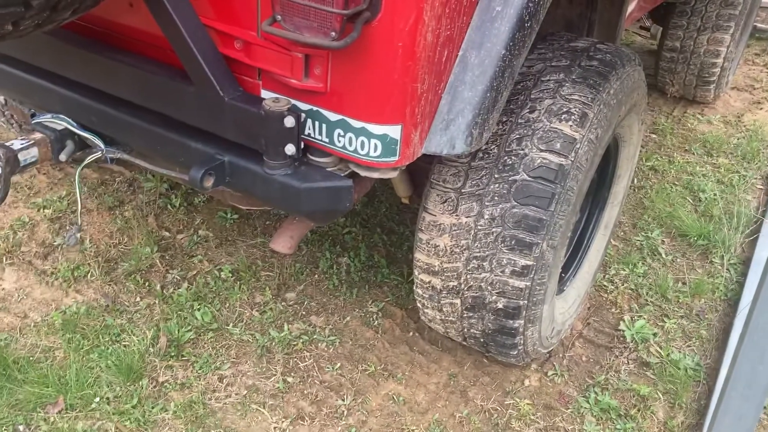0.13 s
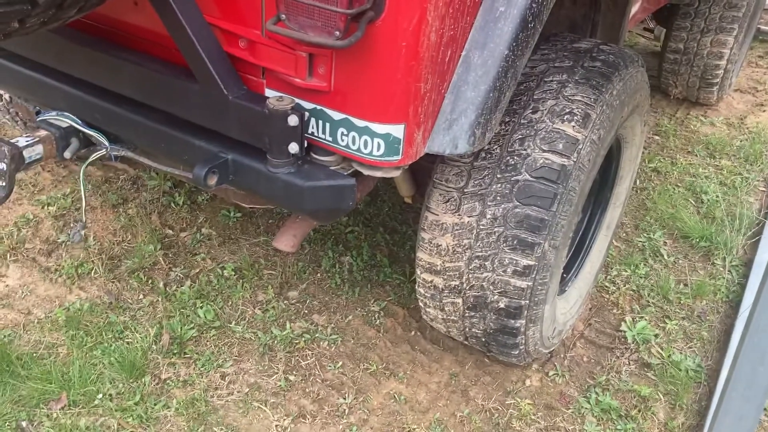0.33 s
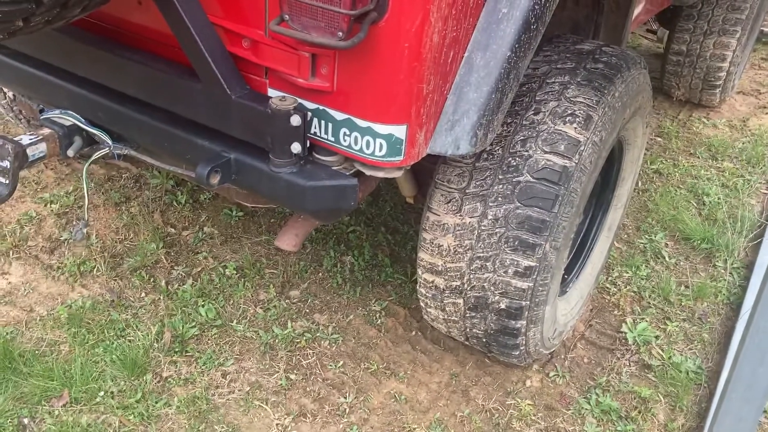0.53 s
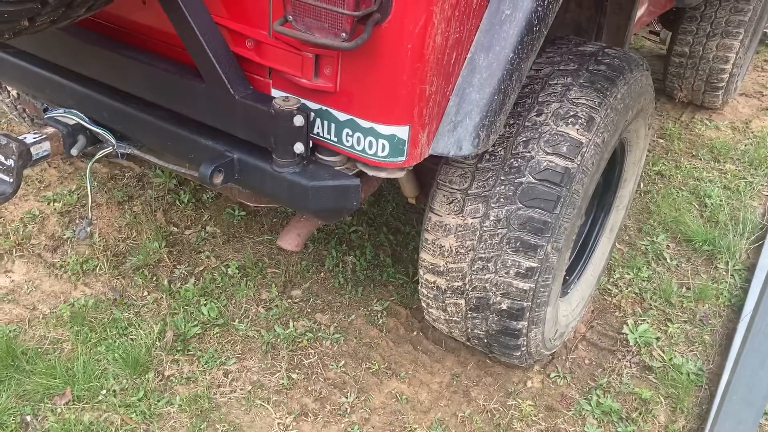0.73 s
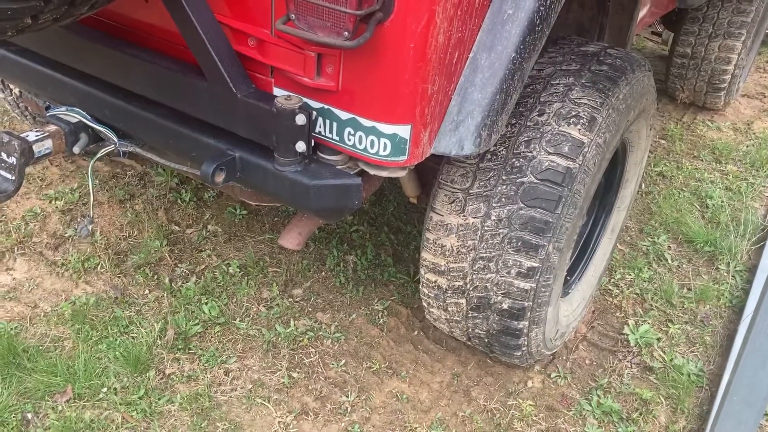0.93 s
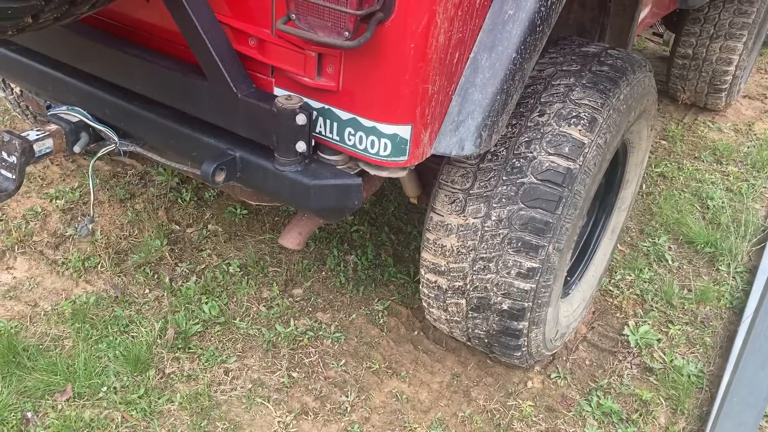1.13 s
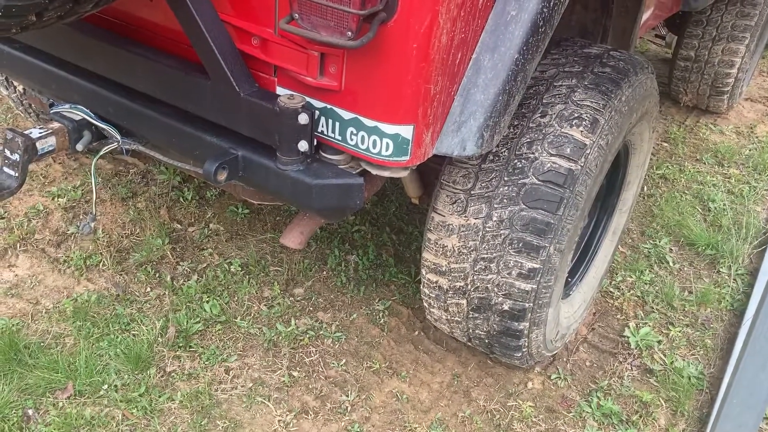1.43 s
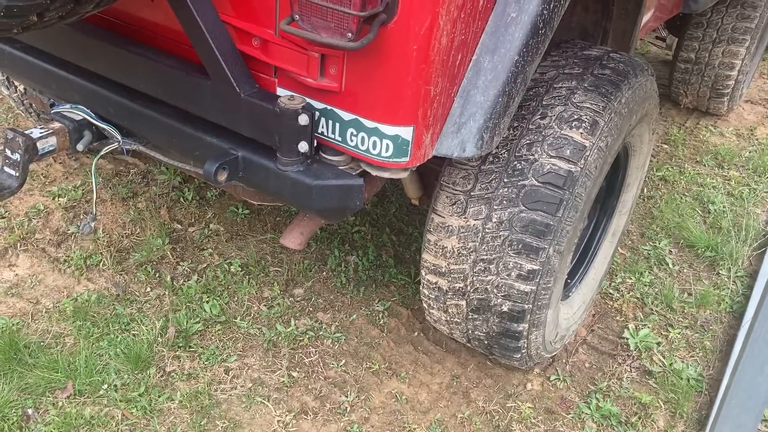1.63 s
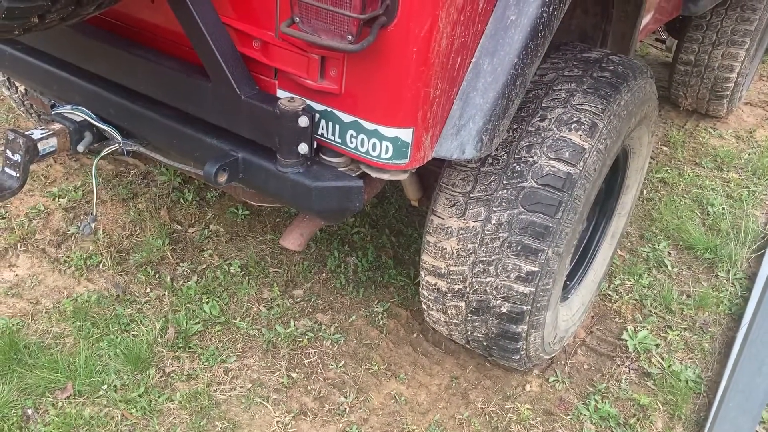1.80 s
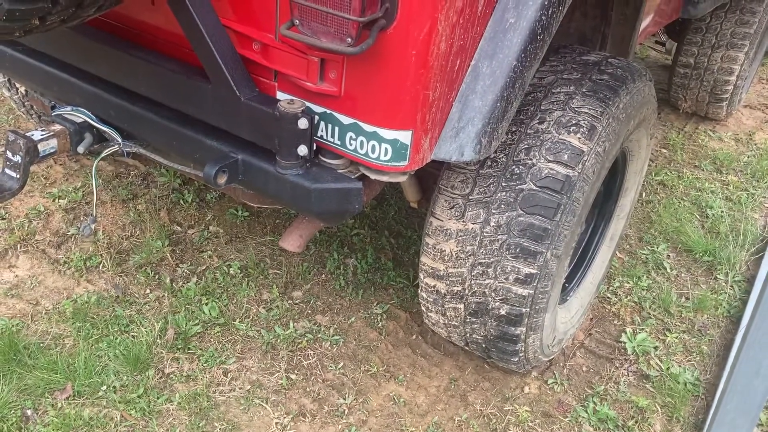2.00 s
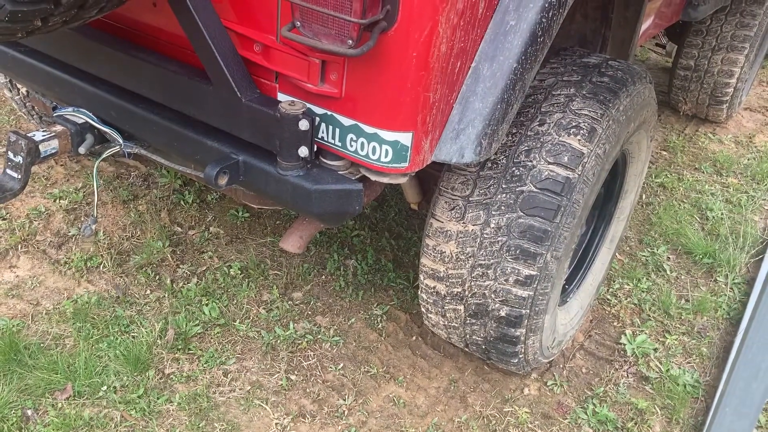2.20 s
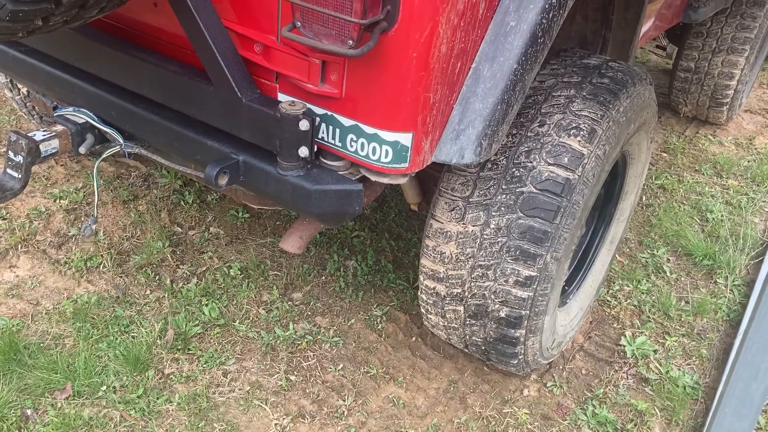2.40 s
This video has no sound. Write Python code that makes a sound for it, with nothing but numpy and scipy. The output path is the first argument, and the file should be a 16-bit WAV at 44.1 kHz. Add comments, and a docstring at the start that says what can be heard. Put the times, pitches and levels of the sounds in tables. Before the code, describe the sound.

An off-road vehicle's engine idles outdoors, heard close to the tailpipe, from the start until the end at about 2.5 seconds. Low exhaust thumps, about thirty a second, merge into a steady, throaty rumble and hum with soft puffs of gas. Quick metallic ticks follow the beat, some standing out more sharply. Loose metal rattles lightly over a constant rush of fan and belts. The engine speed stays even.

```python
"""Idling engine at the tailpipe

Outdoors, a stereo microphone stands beside the tailpipe of a parked four-cylinder off-road vehicle.
Every firing sends a low thump, its echoes and a puff of gas down the exhaust; about half a beat later
comes a metallic tick, different for each cylinder. Loose metal clatters over the rush of fan and belts."""
import sys
import numpy as np
from scipy import signal
from scipy.fft import rfft, irfft, next_fast_len
from scipy.io import wavfile
from scipy.ndimage import uniform_filter1d

SR = 44100
rng = np.random.default_rng(int(sys.argv[2]) if len(sys.argv) > 2 else 0)


def pcm_store(signal):
    """Save signal as 16-bit PCM."""
    levels = np.round(np.clip(np.atleast_2d(signal), -1, 1) * 32767)
    wavfile.write(sys.argv[1], SR, levels.astype(np.int16).T)


N = 112455

FIRING_HZ, FIRST_S, JITTER_S, UNEVEN_DB = 30.91, 0.0185, 0.00018, 0.74
RISE_S = 0.0013  # attack of every noise burst and scrape
# stereo balance (frequency [Hz], left minus right [dB])
BALANCE = [(60, .6), (99, .9), (270, 1), (450, 3), (740, 3), (1220, 2.5), (2010, 2), (3330, .5), (5500, -1),
           (9000, 0)]


def thumps(times, db, throat_db):
    """Each firing sends a rounded pressure pulse and its echoes through the muffler and out of the pipe."""
    # the pulse and its echoes in pipe and muffler (delay [s], width [s], level [dB])
    echoes = [(0, 0.0017, 0.5), (.00924, 0.0018, -2.5), (0.0177, 0.0018, -1.5), (0.0241, 0.001, -17.5)]
    # what the muffler lets through (frequency [Hz], gain [dB])
    muffler = [(20, -16.5), (45, -4.5), (62, -1.5), (123, 0.5), (140, -31.5), (160, -4.5), (186, 3.5),
               (215, -2.5), (280, -1.5), (500, -12)]
    # throaty band of the exhaust (frequency [Hz], gain [dB])
    throat = [(140, -67), (165, -26), (186, 3.5), (215, 2.5), (245, -0.5), (275, -5), (330, -44)]
    t, hz = np.arange(-SR // 50, SR // 20) / SR, np.fft.rfftfreq(2 * N, 1 / SR)
    shape = sum(amp(level) * np.exp(-.5 * ((t - delay) / width) ** 2) for delay, width, level in echoes)
    drive = rfft(train(times, db), 2 * N) * amp(read(muffler, hz))
    drive += rfft(train(times, throat_db), 2 * N) * amp(read(throat, hz))
    pulses = irfft(drive * rfft(shape, 2 * N))[np.argmin(abs(t)):][:N]
    open_end = signal.butter(2, 30.5, "high", fs=SR)
    return -amp(-9.5) * signal.lfilter(*open_end, pulses)


def drone(times, db):
    """The firings keep exhaust and body humming."""
    # their resonances (frequency [Hz], width [Hz], rms level [dB], share of the swell)
    modes = [(31.36, 5.7, -37, 0.14), (421.2, 5.2, -48.5, 0.7), (443.2, 5.1, -48, 0),
             (540.7, 9.1, -45.5, 0.85), (655, 7.5, -47, 1), (843.5, 9.3, -55.5, 0.32)]
    # swell of the pipe's upper resonances (time [s], level at full share [dB])
    swell = [(0, -2.5), (.23, 0), (.4, -1), (.66, -1), (.81, -5.5), (.91, 6.5), (1.05, -3), (1.16, 2.5),
             (1.28, -17), (1.34, 1.5), (1.64, 3), (1.72, -3), (1.82, 3.5), (2.05, -5), (2.17, -0.5),
             (2.35, -6), (2.45, -3.5)]
    firings = train(times, db)
    swell_db = np.interp(np.arange(N) / SR, *np.transpose(swell))
    return sum(amp(level) * unit(amp(share * swell_db) * ring(ring(firings, hz, width), hz, hz / 4))
               for hz, width, level, share in modes)


def puffs(times, db):
    """Gas rushes out after each pulse and sounds the pipe's higher resonances."""
    # colour of the gas leaving the pipe (frequency [Hz], gain [dB])
    spectrum = [(20, -33), (45, -9), (120, -10), (160, -16), (225, 5), (280, -2), (360, -7.5), (435, 0.5),
                (490, -17.5), (545, -4), (655, -6), (730, -10), (950, -10), (2000, -33)]
    gas = bursts(times, db, decay_s=0.12, tail_s=0.19, tail_db=13)
    return amp(-39) * unit(colour(gas, spectrum))


def ticks(times, cylinder_db):
    """A knock, a click and a metallic ring follow each firing; some ticks stand out."""
    # ticks that stand out (time [s], knock, click [dB before swing], low, middle, high ring [dB])
    accents = [(0.0322, 2.5, 0, -2, 9.5, -2), (0.099, 3, -4, -10, 3, -5), (0.1622, -18, 2, 2.5, 5.5, 0.5),
               (0.2605, 4, -2, -10, 2, -8), (0.2909, -8, 3, -9, 5, -6), (0.356, 4.5, 0, -1, 5.5, -3.5),
               (0.4212, 0.5, 2, -8, 6.5, -5), (0.5175, 1, -4.5, -6, -4, -15),
               (0.5505, -7, 2, -21, 8.5, -3.5), (0.6783, -6, 1, -4, 5.5, -7),
               (0.7763, -1, -3.5, -19, 3, -17.5), (0.808, -1, 2.5, 8, 4.5, 0),
               (0.935, 5.5, 1.5, 4, 1.5, -2.5), (1.0004, -3, -4, 2.5, -4.5, -2),
               (1.0649, -8, 1.5, 1.5, 5.5, -1.5), (1.1625, 6, 0.5, -6, -7, -6),
               (1.1948, 3.5, 0, -4, 4.0, -1), (1.2941, 0.5, -4, -5, -8, -14), (1.326, -2, 0.5, -3.0, 3, -5),
               (1.3906, 4, -7, -7, 6, -6), (1.4552, -3, 1, 4, 10.5, -7), (1.488, 7, -4, -11, -11, -15),
               (1.586, 2.5, -2, 9, -5, 2.5), (1.6506, 5.5, -5, 9, 6, -7.5),
               (1.7134, -10, 2.5, -13, 0.5, -0.5), (1.7776, 2, -3, 1, 9, -10), (1.8443, 2, 1.5, 3, 1.0, 0),
               (1.9062, 2.5, -3.5, 7, 7, -6), (1.9718, 4, 1, 1, 2, -4), (2.101, -8, -0.5, 8.5, 5, -3.5),
               (2.166, 7, -3, 2, -3, -9), (2.2311, 2.0, 1, -8, 2, -3.5), (2.264, 5.5, -7, -3, -3, -11),
               (2.3616, -5, -1, 9, 2, -1.5), (2.4246, 4, -2, 9, 4.5, -9), (2.4898, -6.0, 3, -7, 6.0, -3.5)]
    # dull knock (frequency [Hz], gain [dB])
    knock_spectrum = [(300, -32.5), (950, -19), (1140, -4), (1230, 0.5), (1330, -7), (1450, 2), (1560, -5),
                      (1700, -3), (1880, 3), (2080, -6), (2400, -3.5), (2700, -19), (4000, -34)]
    # broad click (frequency [Hz], gain [dB])
    click_spectrum = [(1500, -31), (2800, 0), (4500, -5.5), (5800, 3), (7200, 4), (7800, 4.5), (9000, -5),
                      (10300, 6), (11000, -1.5), (12800, 0.5), (14500, -10), (16000, -7)]
    # ringing metal (frequency [Hz], width [Hz], rms level [dB], ring: 0 low / 1 middle / 2 high)
    modes = [(3160, 71, -42, 0), (3290, 210, -46.5, 0), (4161, 71, -39, 1), (4730, 90, -44.5, 2),
             (5248, 54, -42.5, 2)]
    lag_s, jitter_s, spread_db = 0.015, 0.0007, 2.05
    knock_swing, click_swing = 0.85, 1.1
    chance = rng.uniform(-1, 1, (len(times), 6)) * np.sqrt(3)
    rows = np.c_[times + lag_s + jitter_s * chance[:, 0], cylinder_db + spread_db * chance[:, 1:]]
    for accent in accents:  # each takes the place of the nearest tick
        rows[np.argmin(abs(rows[:, 0] - accent[0]))] = accent
    times, knock, click, *ring_db = rows.T
    knocks = bursts(times, knock_swing * knock, decay_s=0.014, tail_s=0.026, tail_db=-12)
    clicks = bursts(times, click_swing * click, decay_s=0.013, tail_s=0.018, tail_db=5)
    out = amp(-40.5) * unit(colour(knocks, knock_spectrum))
    out += amp(-42) * unit(colour(clicks, click_spectrum))
    for hz, width, db, which in modes:
        pings = np.zeros((2, N))
        for s, level in zip(times, ring_db[which]):
            add(pings, s, amp(level) * ping(hz, width))
        out += amp(db) * unit(pings)
    return out


def ping(hz, width):
    """One clean contact, a short scrape and a small bounce set a resonance ringing."""
    snap_s, tail_s = 0.0041, 0.019
    t = np.arange(SR // 12) / SR
    detune, late = rng.uniform(-1, 1, 2) * np.sqrt(3)
    scrape = np.minimum(t / RISE_S, 1) * (np.exp(-t / snap_s) + amp(2) * np.exp(-t / tail_s))
    drive = unit(scrape * rng.standard_normal((2, len(t))))
    for s, db in (0, -3), (0.011 + 0.0016 * late, -11.5):  # contact, bounce
        drive[0, np.argmin(abs(t - s))] += amp(db) * np.sqrt(2 * len(t))
    pitch = hz * (1 + 0.0063 * detune)  # each contact lands a little differently
    return unit(ring(ring(drive, pitch, width), pitch, width * 8))


def clatter():
    """Loose metal is shaken into stray taps."""
    # loose parts (frequency [Hz], width [Hz], rms level [dB])
    parts = [(1137.5, 16, -47), (1234, 130, -50), (1322, 14, -51.5), (1542, 27, -53), (1858, 25, -45.5),
             (3610, 23, -49.5), (4750, 120, -50.5), (7900, 220, -54.5)]
    taps_per_s, spread_db = 60, 7.5
    out = np.zeros((2, N))
    for hz, width, db in parts:
        hits = rng.random((2, N)) < taps_per_s / SR
        taps = hits * amp(spread_db * np.minimum(rng.exponential(1, (2, N)), 3))
        out += amp(db) * unit(ring(ring(taps, hz, width), hz, width * 8))
    return out


def rush():
    """Fan and belts lay a steady, slightly flickering noise behind the exhaust."""
    # colour of the rush (frequency [Hz], gain [dB])
    spectrum = [(20, -11), (80, 17), (300, 5), (600, 7), (950, -4.5), (1200, 8), (1850, 3), (2150, -0.5),
                (2700, 1), (3100, 8.5), (3600, 7), (3850, 0.5), (4150, 8.5), (4450, -3.5), (4800, 6),
                (5300, -1), (5600, -3.5), (7200, -4.5), (7700, -3), (8300, -3), (10300, -7), (11000, -9),
                (13000, -13), (14500, -23), (16000, -26)]
    flicker_db = unit(uniform_filter1d(rng.standard_normal(N), size=300))
    noise = rng.standard_normal((2, N)) * amp(flicker_db)
    return amp(-34) * unit(colour(noise, spectrum))


def stereo_balance(mono):
    """The exhaust's thump and hum sit a little left of centre, in phase on both channels."""
    balance_db = read(BALANCE, np.fft.rfftfreq(2 * N, 1 / SR))
    return irfft(rfft(mono, 2 * N) * amp([balance_db / 2, -balance_db / 2]))[:, :N]


def stereo_spread(pair):
    """Left-right phase and likeness by frequency for puffs, ticks, clatter and rush; above about 6 kHz the two
    channels swing in and out of phase."""
    # left-right likeness (frequency [Hz], coherence [0-1])
    likeness = [(200, 0.94), (550, 0.9), (950, 0.76), (1300, 0.88), (2000, 0.68), (2650, 0.43), (3000, .95),
                (3400, .95), (3650, 0.35), (4150, 0.93), (4550, 0.6), (4900, 0.7), (5300, .9), (5850, 0.15),
                (6800, .95), (8000, 0.65), (8700, .98), (9400, .98), (10500, 0.68), (11300, 0.97),
                (12500, 0.56), (13400, .97), (16000, .9)]
    # left-right phase (frequency [Hz], phase [rad])
    phase = [(20, 0.1), (1400, 0.2), (1900, 0.5), (2150, -0.1), (3000, 2.7), (3500, 3.1), (4200, 4.1),
             (4900, 4.3), (5400, 5.7), (6000, 6.8), (6800, 6.3), (7400, 6.1), (8600, 3.2), (9400, 3.1),
             (11000, 0.1), (11900, -0.3), (13200, -3.1), (14400, -3.2), (15100, -6.2)]
    size = next_fast_len(N + 4096)
    hz = np.fft.rfftfreq(size, 1 / SR)
    left, other = rfft(pair, size)
    same, lean = read(likeness, hz), amp(read(BALANCE, hz) / 2)
    right = (same * left + np.sqrt(1 - same ** 2) * other) * np.exp(-1j * read(phase, hz))
    return irfft(np.array([left * lean, right / lean]), size)[:, :N]


def amp(db):
    """Decibels to gain."""
    return 10 ** (np.asarray(db) / 20)


def unit(x):
    """Scales to rms 1."""
    return x / np.sqrt(np.mean(x ** 2) + 1e-20)


def read(points, hz):
    """Reads a table on a log-frequency axis."""
    f, value = np.transpose(points)
    return np.interp(np.log(hz + 1), np.log(f + 1), value)


def colour(x, points, size=16384):
    """Minimum-phase filter with the given spectrum."""
    log_gain = np.log(amp(read(points, abs(np.fft.fftfreq(size, 1 / SR)))))
    taps = np.fft.ifft(np.exp(signal.hilbert(log_gain).conj())).real[:size // 2]
    return signal.fftconvolve(x, taps[None], axes=1)[:, :N]


def ring(x, hz, width):
    """One resonance, its width in Hz."""
    r = np.exp(-np.pi * width / SR)
    return signal.lfilter([1, 0, -1], [1, -2 * r * np.cos(2 * np.pi * hz / SR), r * r], x)


def train(times, db):
    """Impulses at the given times and levels."""
    out, at = np.zeros(N), np.round(times * SR).astype(int)
    inside = (at >= 0) & (at < N)
    out[at[inside]] = amp(db)[inside]
    return out


def bursts(times, db, decay_s, tail_s, tail_db):
    """Two independent rows of 125 ms noise bursts: a quick rise, then a decay plus a slower tail."""
    t = np.arange(SR // 8) / SR
    fall = np.exp(-np.maximum(t - RISE_S, 0) / decay_s) + amp(tail_db) * np.exp(-t / tail_s)
    shape = np.minimum(t / RISE_S, 1) * fall
    power = signal.fftconvolve(train(times, db) ** 2, shape ** 2)[:N]
    return np.sqrt(abs(power)) * rng.standard_normal((2, N))


def add(mix, s, sound):
    """Mixes a sound in at time s."""
    part = mix[:, max(round(s * SR), 0):][:, :sound.shape[1]]
    part += sound[:, :part.shape[1]]


def scene():
    """Exhaust and ticks follow one firing clock; clatter and rush run freely behind them."""
    # one row per cylinder (thump, throat [dB], knock, click [dB before swing], low, middle, high ring [dB])
    cylinders = [(0.14, 2, -2, 2, -0.5, 4, -1.5), (-0.84, -3, 0.5, -9, -3, -6, -13),
                 (-0.25, 3.5, -3, -4.5, 2, -1, -10), (-1.06, -7, -2, -4.5, -10, -2, -15)]
    # the idle hunts around a steady beat (time [s], lag [s])
    hunting = [(0, -.0001), (.15, .0011), (.25, -.0004), (.37, -.0003), (.45, .0008), (.58, -.0009),
               (.73, .0005), (.89, -.0022), (1, -.0018), (1.14, -.0036), (1.29, 0), (1.39, -.0015),
               (1.48, -.0012), (1.59, .0004), (1.92, -.0014), (2.04, 0), (2.17, -.0018), (2.32, -.0001),
               (2.43, -.0018), (2.55, -.0003)]
    # strength of the exhaust beats (time [s], level [dB])
    effort = [(0.02, 2), (0.15, 0.7), (0.22, 1.8), (0.34, 0.2), (0.41, 2), (0.53, 0), (0.68, 1.5),
              (0.82, 0), (0.96, 1.3), (1.08, 0.5), (1.15, 1), (1.19, 1.5), (1.28, 2), (1.35, 0.1),
              (1.47, 0.7), (1.54, 3), (1.63, 0.2), (1.83, 1.5), (1.9, 0.5), (1.99, 2), (2.09, 0.8),
              (2.26, 1.5), (2.38, -0.5), (2.5, 2)]
    beat = np.arange(int(N / SR * FIRING_HZ) + 1)
    clock = FIRST_S + beat / FIRING_HZ
    cylinder = np.array(cylinders)[beat % len(cylinders)]
    late, strong = rng.standard_normal((len(beat), 2)).T
    times = clock + np.interp(clock, *np.transpose(hunting)) + JITTER_S * late
    effort_db = np.interp(clock, *np.transpose(effort)) + UNEVEN_DB * strong
    db = effort_db + cylinder[:, 0]
    throat_db = 1.87 * effort_db + cylinder[:, 1]  # the throat swells more steeply than the thump
    exhaust = stereo_balance(thumps(times, db, throat_db) + drone(times, db))
    return exhaust + stereo_spread(puffs(times, db) + ticks(times, cylinder[:, 2:]) + clatter() + rush())


def record(dry):
    """The recorder's band limit."""
    lowpass = signal.firwin(511, cutoff=15850, window=("kaiser", 9), fs=SR)
    return signal.oaconvolve(dry, lowpass[None], "same")


dry = scene()
out = record(dry)
pcm_store(out)
```